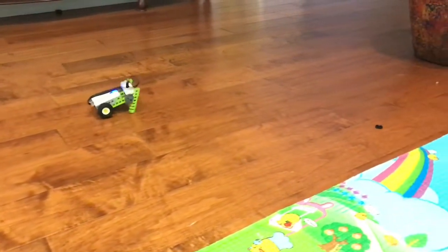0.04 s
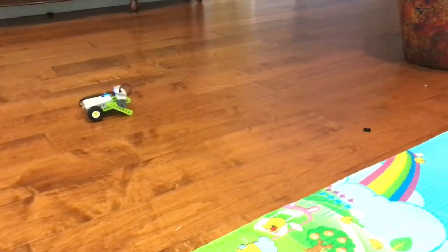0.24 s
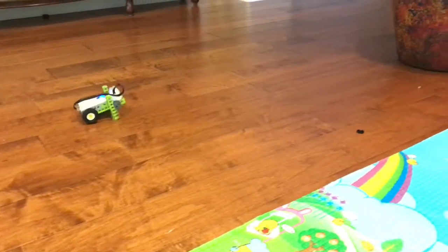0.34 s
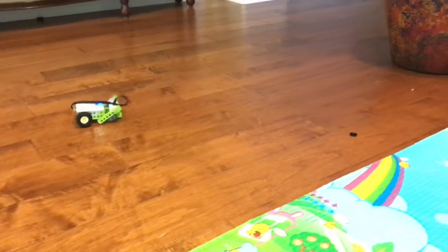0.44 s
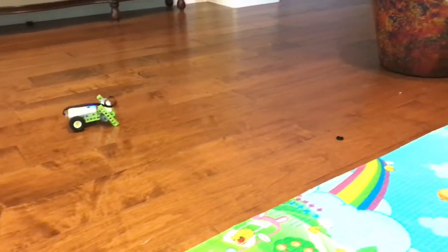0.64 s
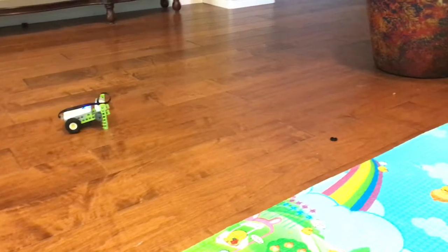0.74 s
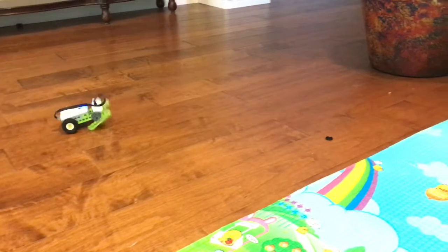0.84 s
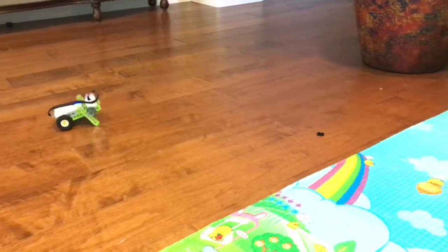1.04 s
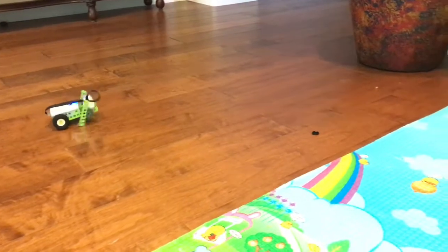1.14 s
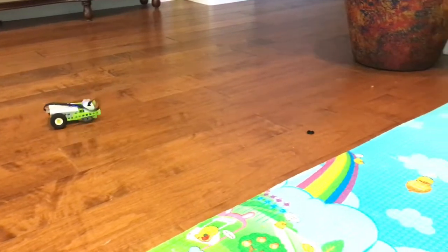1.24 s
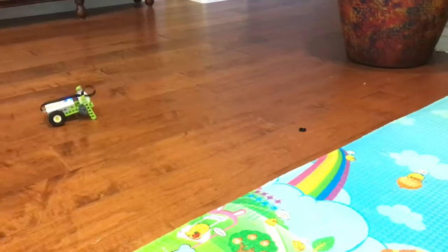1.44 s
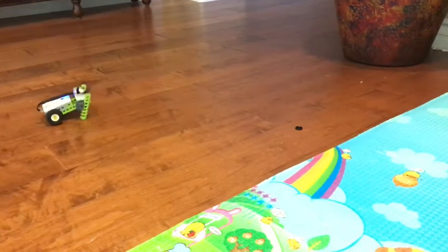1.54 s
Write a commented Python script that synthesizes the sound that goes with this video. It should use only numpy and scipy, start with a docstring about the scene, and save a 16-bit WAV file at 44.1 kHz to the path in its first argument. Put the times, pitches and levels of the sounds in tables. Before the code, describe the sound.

Plastic clacks from a little motorised toy robot crossing a wooden floor alternate sharp and dull, twice over. Gears whirr and loose parts tick between them, heard from a short distance in a slightly echoing room with faint hiss.

```python
"""Gears whirr and loose parts tick over a low hum and the hiss of a room: a small plastic toy robot
is crawling over a wooden floor, a couple of metres away. Its motor-driven leg snaps over with a
sharp clack, then its body drops back with a duller one and rattles. This happens twice.
The whirr comes from gear teeth knocking together and swells as the motor works harder.
Each clack is plastic hitting, rattling and ringing briefly, and the room echoes it."""
import sys
import numpy as np
from scipy import signal
from scipy.fft import rfft, irfft
from scipy.io import wavfile
from scipy.ndimage import uniform_filter1d

SR = 44100
rng = np.random.default_rng(int(sys.argv[2]) if len(sys.argv) > 2 else 0)


def transcribe(signal):
    """Save signal, clipped to [-1, 1], as a 16-bit WAV file at the path in sys.argv[1]."""
    frames = np.atleast_2d(signal).T
    limited = np.clip(frames, -1, 1)
    pcm = np.round(limited * 32767).astype(np.int16)
    wavfile.write(sys.argv[1], SR, pcm)


N = 70560


def gain(db):
    """Turn decibels into a number to multiply by."""
    return 10 ** (np.asarray(db) / 20)


def unit_energy(x):
    """Scale a sound to an energy of one."""
    return x / np.sqrt(np.sum(x ** 2))


def set_level(x, db):
    """Scale a sound to an average (rms) level."""
    return x / np.std(x) * gain(db)


def read_curve(points, hz):
    """Read between (pitch_hz, value) points, giving each octave equal space."""
    pitches, values = np.array(points, float).T
    return np.interp(np.log(np.maximum(hz, 1)), np.log(pitches), values)


def convolve(x, response):
    """Pass a sound through a filter or room, given its response to one click."""
    return signal.fftconvolve(x, response)[:N]


def colour(x, points, tilt_db=0, size=2048):
    """Shape the tone with (pitch_hz, level_db) points, adding tilt_db per octave above 1000 Hz."""
    hz = np.maximum(np.fft.rfftfreq(size, 1 / SR), 1)
    curve_db = read_curve(points, hz) + tilt_db * np.log2(np.maximum(hz, 1000) / 1000)
    cepstrum = irfft(np.log(gain(curve_db)))
    # fold it in half so the filter never sounds before its input
    cepstrum[1:size // 2] *= 2
    cepstrum[size // 2 + 1:] = 0
    return convolve(x, irfft(np.exp(rfft(cepstrum))))


def wander(rate_hz):
    """A smooth random drift with a spread of one."""
    hold = int(SR / rate_hz)
    steps = np.repeat(rng.standard_normal(N // hold + 1), hold)
    drift = uniform_filter1d(steps, hold)[:N]
    return (drift - drift.mean()) / drift.std()


def gears():
    """Gear teeth knock unevenly, rasping and making the gearbox whirr, louder under load."""
    # how the motor's load lifts or lowers the whirr: time_s, level_db
    motor_load = [(0, 10.5), (0.118, -9.5), (.18, 6.5), (.3, 0), (.41, 0), (.47, 9.5), (.56, 15.5),
                  (.68, 3), (0.799, -15), (.89, -4), (.95, 15.5), (1.1, -2), (1.25, 2), (1.35, 6),
                  (1.54, -9), (1.6, -5.5)]
    # tone of the rasping teeth: pitch_hz, level_db
    rasp_tone = [(200, -15.5), (600, -15.5), (1000, -11), (1600, -7), (2100, -7), (2500, -7), (3050, -8.5),
                 (3500, -14), (5200, -22), (7500, -15.5), (8900, -10), (10500, -19), (15800, -26)]
    teeth_per_s, scatter_db, flutter_db = 1500, 4, 2.18
    whirr_band_hz, rasp_load_share = [1838, 2218], 0.33
    teeth = (rng.random(N) < teeth_per_s / SR) * rng.choice([-1, 1], N)
    teeth = teeth * gain(scatter_db * rng.standard_normal(N))
    load_db = np.interp(np.arange(N) / SR, *np.array(motor_load).T)
    rasp = set_level(colour(teeth, rasp_tone), db=-58) * gain(rasp_load_share * load_db)
    gearbox = signal.butter(2, whirr_band_hz, "band", fs=SR, output="sos")
    whirr = set_level(signal.sosfilt(gearbox, teeth), db=-66) * gain(load_db)
    return (rasp + whirr) * gain(flutter_db * wander(rate_hz=60.16))


def hum_and_hiss():
    """A wavering low hum and the steady hiss of the room."""
    # notes of the hum: pitch_hz, level_db
    hum_notes = [(55, -60), (91.5, -69)]
    # tone of the hiss: pitch_hz, level_db
    hiss_tone = [(25, -36), (40, -2), (60, 3.5), (100, 4.5), (150, -2), (250, -2), (600, -11.5),
                 (1500, -12.5), (5000, -12.5), (15800, -16)]
    waver_db, drift_rad = .7, .25
    t, hum = np.arange(N) / SR, np.zeros(N)
    for hz, db in hum_notes:
        note = np.sin(2 * np.pi * hz * t + drift_rad * wander(rate_hz=5))
        hum += set_level(note, db) * gain(waver_db * wander(rate_hz=8.1))
    return hum + set_level(colour(rng.standard_normal(N), hiss_tone), db=-58.5)


def ringing(notes, hit_number, t):
    """A struck part rings with several notes, each falling 60 dB in its fade_s."""
    ring = np.zeros(len(t))
    for hz, fade_s, *levels_db in notes:
        note = np.sin(2 * np.pi * (hz * t + rng.random())) * np.exp(-np.log(1000) * t / fade_s)
        ring += gain(levels_db[hit_number % len(levels_db)]) * unit_energy(note)
    return ring


def plastic_hits(hits, tone, notes, ring_db):
    """Plastic chatters, rattles and rings. Returns the direct sound and a smoother one for the room."""
    attack_ms, rattle_s, ring_in_room_db = 0.19, 0.015, -5.5
    t, paths = np.arange(N // 4) / SR, np.zeros((2, N))
    ms, length = t * 1000, len(t)
    for hit_number, (start_s, level_db, tilt_db, contact_ms, rattle_db) in enumerate(hits):
        chatter, joint_noise = rng.standard_normal((2, length))
        touch = (1 - np.exp(-(ms / attack_ms) ** 2)) * np.exp(-(ms / (2 * contact_ms)) ** 2)
        # make all pitches in the burst equally strong
        even_burst = irfft(np.exp(1j * np.angle(rfft(chatter * touch))), length)
        contact = unit_energy(even_burst * touch)
        rattle = gain(rattle_db) * unit_energy(joint_noise * np.exp(-t / rattle_s))
        ring = ringing(notes, hit_number, t) * (1 - np.exp(-ms / contact_ms))
        ring = gain(ring_db) * unit_energy(ring)
        start = int(start_s * SR)
        # the room gets the sum of all directions, so one clean click stands in for the chatter
        pushes = contact + rattle, signal.unit_impulse(length)
        for path, push, ring_share in zip(paths, pushes, (1, gain(ring_in_room_db))):
            knock = unit_energy(colour(push, tone, tilt_db)[:length])
            hit = gain(level_db) * (knock + ring_share * ring)
            path[start:start + length] += hit[:N - start]
    return paths


def loose_ticks():
    """Loose parts and gear teeth tick softly and ring the gearbox."""
    # each tick: start_s, level_db, treble_db_per_octave, contact_ms
    ticks = [(.0725, -30, -5.5, 3.5), (.0795, -26.5, -3, 2.5), (.158, -38, -6, 5), (.177, -28.5, -4, 4.6),
             (.4526, -18, -1.5, 1.7), (0.5655, -16.5, 2.5, 1.7), (.5838, -15, -1, 1.4),
             (.6455, -13, 2.5, 2.5), (.7555, -26, -4, 5), (.828, -25.5, -1, 5), (.925, -23.5, -4.5, 7.8),
             (.9435, -25, 0.5, 4.5), (1.2044, -23, -1, 2.3), (1.257, -25, -3, 2.9), (1.2975, -17, 5, 2.3),
             (1.3967, -13.5, 1, 2.6), (1.583, -25.5, -6.5, 2.8)]
    # tone of a tick: pitch_hz, level_db
    tick_tone = [(100, -19), (600, -25), (1200, -0.5), (1700, -7), (2100, 7), (2800, 0.5), (4000, -7),
                 (5200, -10), (7500, -6.5), (9000, -5), (10500, -15), (14500, -17), (16000, -22)]
    # ringing of the gearbox: pitch_hz, fade_s, level_db
    gearbox_notes = [(1906, 0.021, -1.5), (2098, 0.044, -4.5), (2540, .03, -5), (2917, 0.033, -0.5)]
    rattle_db = -4
    hits = [(*tick, rattle_db) for tick in ticks]
    return plastic_hits(hits, tick_tone, gearbox_notes, ring_db=-7.5)


def leg_snaps():
    """Once a turn the leg snaps over with a sharp clack, struck at a different spot each time."""
    # each snap: start_s, level_db, treble_db_per_octave, contact_ms, rattle_db
    snaps = [(.2235, 6, -0.53, 1.7, -16), (.9731, 6, 0.27, 1.8, -8.5)]
    # tone of a snap: pitch_hz, level_db
    snap_tone = [(100, -24), (450, -21), (800, -11.5), (1400, -2.5), (2700, -0.5), (3600, -1.5), (4400, 0),
                 (5400, -2), (7000, -1.5), (9200, -1), (10400, -8), (12200, -3.5), (14500, -5.5),
                 (15300, -8.5), (17000, -7.5)]
    # ringing of the leg: pitch_hz, fade_s, first_hit_db, second_hit_db
    leg_notes = [(1480, .02, -3, -7), (2020, .1, -9, -9), (2690, .02, -10, 1), (4330, .01, 7, -8),
                 (4520, .009, -2, 0), (6080, .014, 1, -8), (6750, .018, -3, -4), (8020, .05, -9, -7),
                 (12300, .01, -2, -8)]
    return plastic_hits(snaps, snap_tone, leg_notes, ring_db=-7)


def body_drops():
    """The body falls back onto the floor with a duller clack, and its joints rattle."""
    # each drop: start_s, level_db, treble_db_per_octave, contact_ms, rattle_db
    drops = [(.5275, -1.5, -1, 1.28, -3), (1.2777, -2.5, -1.5, 3.5, -1)]
    # tone of a drop: pitch_hz, level_db
    drop_tone = [(100, -16), (500, -17), (720, -14), (1100, -3.5), (1500, -4), (2000, -1), (3000, -3.5),
                 (3900, -1), (5000, -10), (6200, -7.5), (7800, -14.5), (9000, -0.5), (10300, -12.5),
                 (11500, -6), (14500, -8.5), (15500, -13), (17000, -14)]
    # ringing of the body: pitch_hz, fade_s, first_hit_db, second_hit_db
    body_notes = [(990, .05, -15, -7), (1910, .12, -8, -2), (2015, .16, -1, -5), (2150, .1, -8, -10),
                  (3850, .008, -2, 2), (9050, .011, 1, -9), (11050, .035, -20, -5)]
    return plastic_hits(drops, drop_tone, body_notes, ring_db=-5.5)


def room_echo(x, bands=14):
    """Sound bounces off floor and furniture, then blurs into a tail whose treble dies first."""
    # time the echo takes to fall 60 dB: pitch_hz, fade_s
    fade_times = [(200, 0.8), (1000, 0.63), (2200, 0.53), (4500, 0.61), (8000, 0.48), (12000, 0.45),
                  (16000, 0.29)]
    tail_db, early_db, build_up_s, early_fade_s = -3.5, -8.5, 0.0038, 0.011
    t, hz = np.arange(N) / SR, np.fft.rfftfreq(N, 1 / SR)
    noise_spectrum, tail = rfft(rng.standard_normal(N)), np.zeros(N)
    edges_hz = np.linspace(0, np.sqrt(SR / 2), bands + 1) ** 2
    for low, high in zip(edges_hz, edges_hz[1:]):
        band = irfft(noise_spectrum * ((hz >= low) & (hz < high)), N)
        tail += band * np.exp(-np.log(1000) * t / read_curve(fade_times, (low + high) / 2))
    build_up = 1 - np.exp(-(t / build_up_s) ** 2)
    early = rng.standard_normal(N) ** 3 * np.exp(-t / early_fade_s)  # cubing makes it spiky
    early = gain(early_db) * unit_energy(early * build_up)
    tail = gain(tail_db) * unit_energy(tail * build_up)
    return convolve(x, early + tail)


def scene():
    """The toy's thin direct sound, its fuller echo, and the hum and hiss."""
    direct, into_room = leg_snaps() + body_drops() + loose_ticks() + gears()
    bass_cut = signal.butter(2, 754, "high", fs=SR, output="sos")
    return (signal.sosfilt(bass_cut, direct) + room_echo(into_room) + hum_and_hiss())[None]


def record(dry):
    """Cut the deepest rumble and the highest treble."""
    lowest_hz, highest_hz = 33.7, 15850
    dry = signal.sosfilt(signal.butter(4, lowest_hz, "high", fs=SR, output="sos"), dry)
    return signal.sosfilt(signal.ellip(10, .2, 70, highest_hz, fs=SR, output="sos"), dry)


dry = scene()
out = record(dry)
transcribe(out)
```